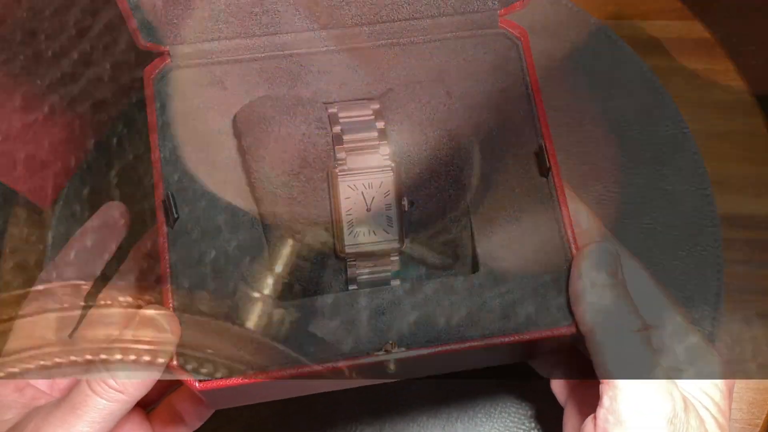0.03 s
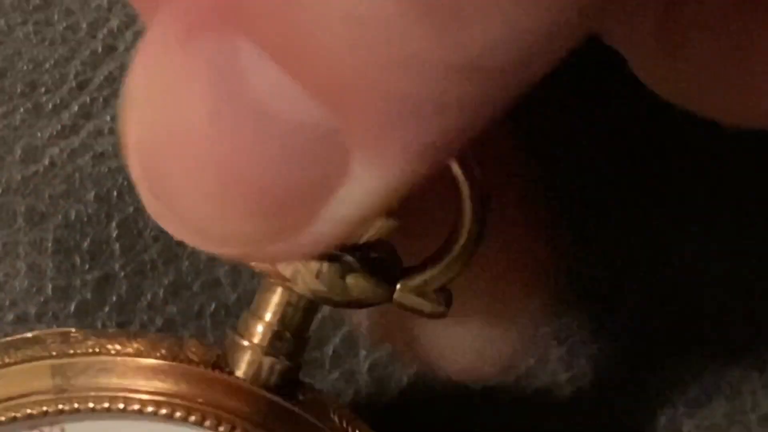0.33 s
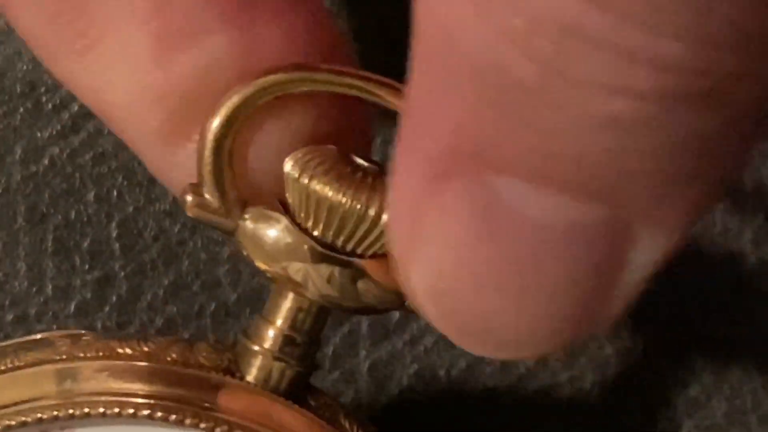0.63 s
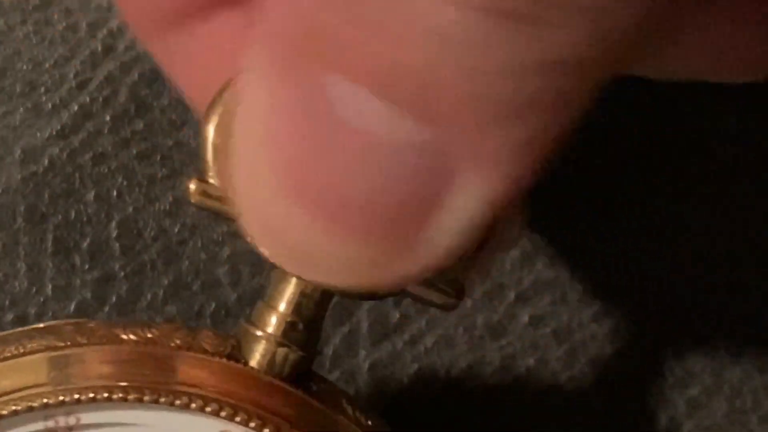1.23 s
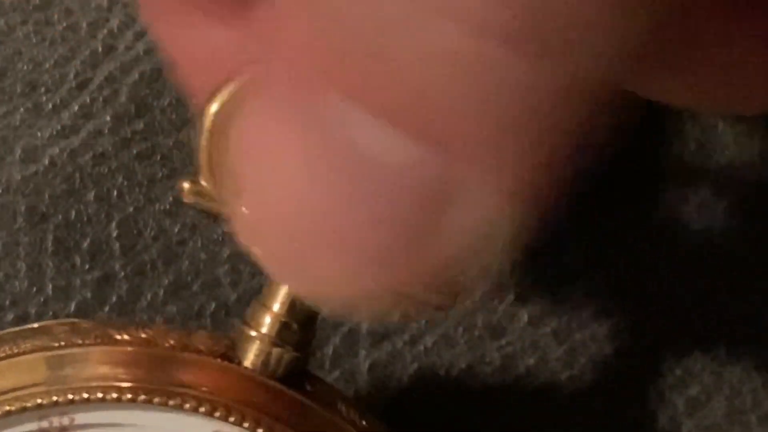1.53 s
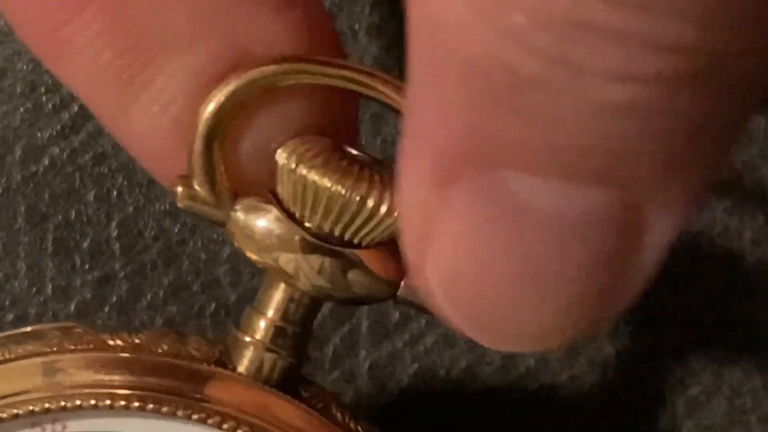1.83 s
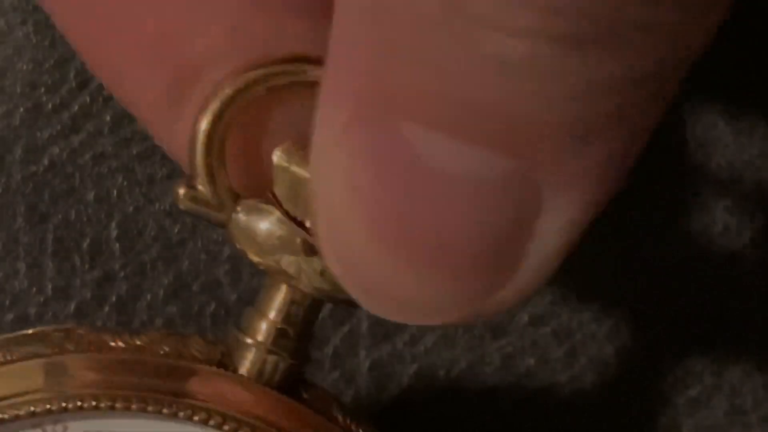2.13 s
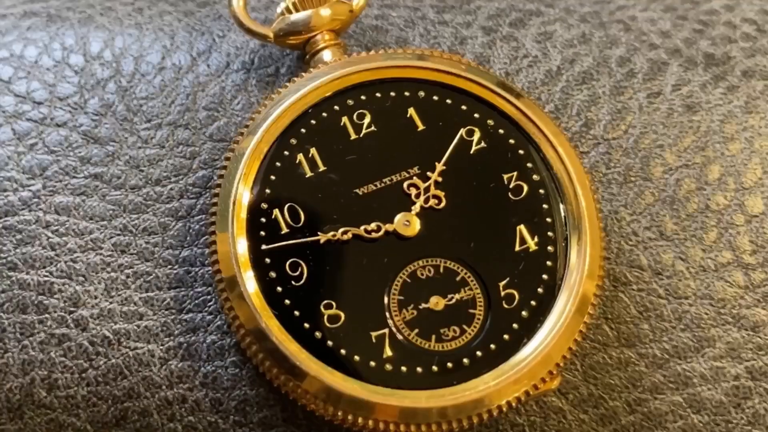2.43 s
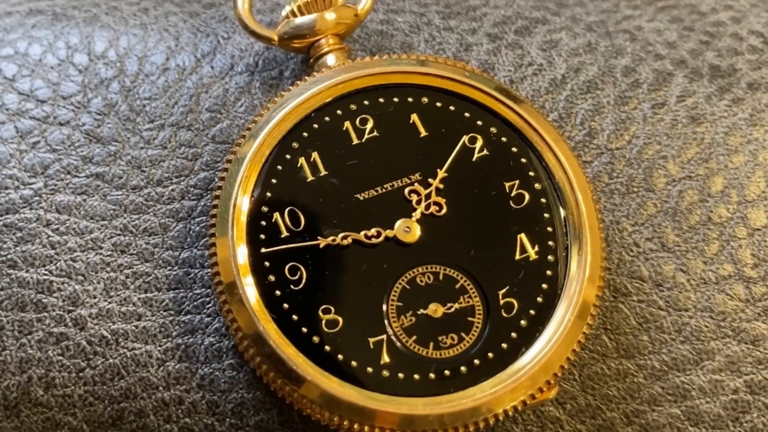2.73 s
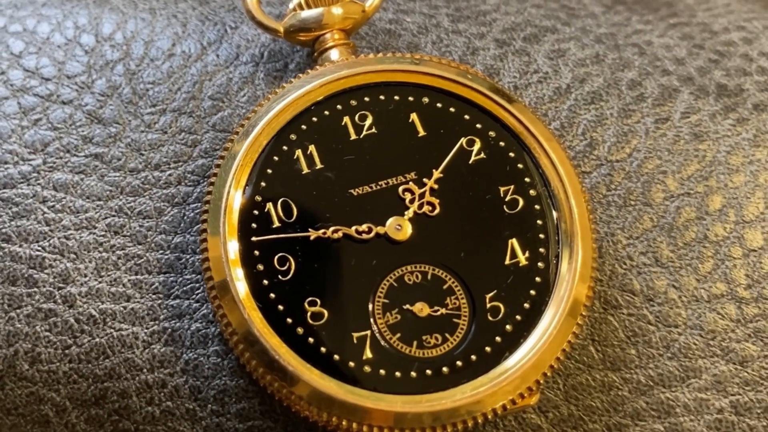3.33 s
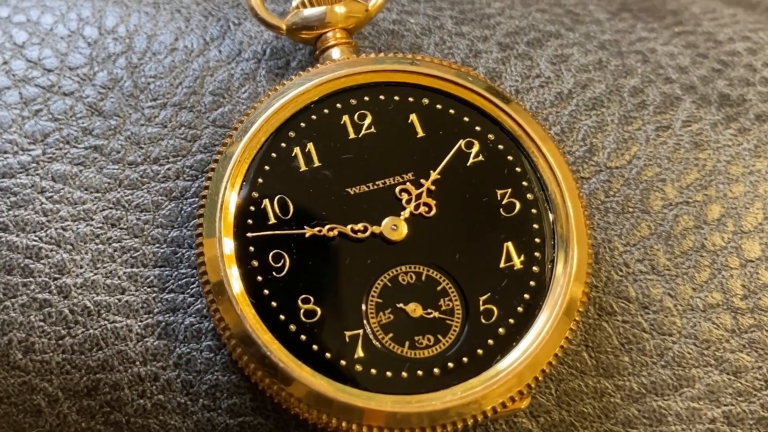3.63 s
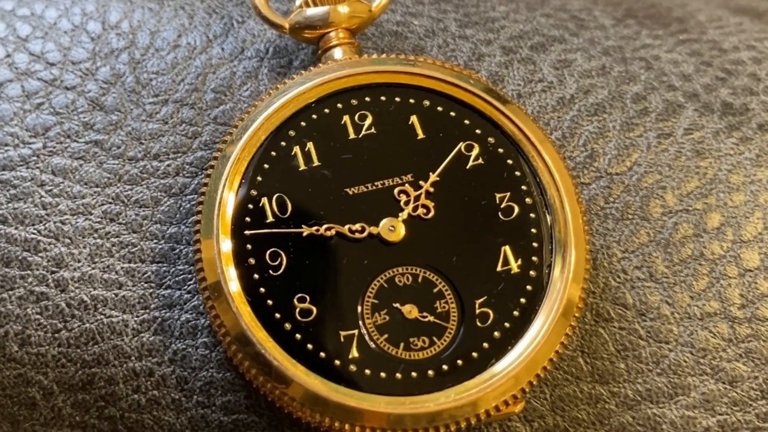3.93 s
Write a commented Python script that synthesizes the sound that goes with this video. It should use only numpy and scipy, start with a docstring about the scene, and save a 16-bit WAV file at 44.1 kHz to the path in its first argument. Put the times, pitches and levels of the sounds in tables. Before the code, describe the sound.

Fingers wind a pocket watch in three clicking strokes, followed by soft, quick ticking.

```python
"""In a humming room, fingers wind a pocket watch close by. Its pawl (a small catch) snaps over the
ratchet teeth in three strokes; between them the thumb rubs the crown (the winding knob), and crown
and bow (the carrying loop) knock as the fingers take a new grip. A deep rumble ends early with a pop.
After a brief silence the watch lies in a quieter room, ticking six times a second as its
escapement lets a toothed wheel go and catches it again."""
import sys
import numpy as np
from scipy import signal
from scipy.fft import rfft, irfft
from scipy.io import wavfile

SR = 44100
rng = np.random.default_rng(int(sys.argv[2]) if len(sys.argv) > 2 else 0)


def transcribe(u):
    """Save the signal u as a 16-bit wav file named by the first command-line argument.

    u: samples, shape (n,) or (channels, n), limited to [-1, 1]; the rate is SR.
    q: integer samples, one column per channel.
    """
    v = np.clip(np.atleast_2d(u).T, -1, 1)
    q = np.round(v * 32767).astype(np.int16)
    wavfile.write(sys.argv[1], SR, q)


N = 176400
T = np.arange(N) / SR
FREQS = np.arange(N // 2 + 1) * SR / N


def amp(db):
    """Turn decibels into a gain."""
    return 10 ** (np.asarray(db) / 20)


def unit(x):
    """Scale a sound so that its energy is 1."""
    return x / np.sqrt(np.sum(x ** 2))


def curve(points, column=1):
    """Join the dots of one table column, giving a value at every pitch."""
    table = np.array(points, float)
    return np.interp(np.log(FREQS + 1), np.log(table[:, 0]), table[:, column])


def colour(x, db):
    """Make some pitches stronger and others weaker, following the curve db."""
    cepstrum = irfft(np.log(amp(db)), N)
    cepstrum[1:N // 2] *= 2  # folded forward, so nothing rings before the hit
    cepstrum[N // 2 + 1:] = 0
    response = irfft(np.exp(rfft(cepstrum)), N)[:len(x) // 100]
    return signal.fftconvolve(x, unit(response))[:len(x)]


def add(out, start_s, x):
    """Mix x into out at the given time."""
    i = max(int(start_s * SR), 0)
    out[i:i + len(x)] += x[:len(out) - i]


def noise(shape):
    """Noise of average (rms) level 1; shape sets the share of each pitch."""
    return unit(irfft(rfft(rng.standard_normal(N)) * shape, N)) * np.sqrt(N)


def burst(decay_s, size=6000):
    """A small metal part shivers; decay_s is always the time to fade by 60 dB."""
    return unit(rng.standard_normal(size) * amp(-60 * T[:size] / decay_s))


def rattle(length_s, decay_s, edge_hz=SR, size=2048):
    """Metal chatters on metal for a moment, then dies away; it is weak above edge_hz."""
    hz = np.linspace(0, SR / 2, size // 2 + 1)
    chatter = irfft(rfft(rng.standard_normal(size)) / (1 + (hz / edge_hz) ** 4))
    return unit(chatter * amp(-60 * np.maximum(T[:size] - length_s, 0) / decay_s))


def ring(notes, edge_hz, scatter_db, detune, size=6000):
    """Struck metal rings, a little differently each time; a soft blow barely stirs notes above edge_hz."""
    t = T[:size]
    hz, db, decay_s = np.array(notes, float).T[:, :, None]
    gain = amp(db + scatter_db * rng.standard_normal(hz.shape)) / (1 + (hz / edge_hz) ** 4)
    hz = hz * (1 + detune * rng.standard_normal(hz.shape))
    waves = np.sin(2 * np.pi * (hz * t + rng.random(hz.shape)))
    attack = np.minimum(t / .00026, 1)
    return unit(np.sum(gain * waves * amp(-60 * t / decay_s), axis=0) * attack)


def stereo(x, table):
    """Each pitch reaches left and right with its own timing and level."""
    half = np.exp(.5j * curve(table)) * amp(curve(table, column=2) / 2)
    return irfft(rfft(x) * np.array([half, 1 / half]), N)


# tone of the sound that the walls send back: pitch_hz, level_db
WALL_TONE = [(1000, -6), (3000, 8), (5300, 3), (6400, 7), (7500, 3), (9000, -3), (12000, -3.5), (14500, -7),
             (16500, -19)]


def echo(x, decay_s, level_db):
    """The walls of a small room blur a sound into a short tail, different left and right."""
    fade = amp(-60 * T / decay_s) * np.minimum(T / .0022, 1)
    tails = [colour(rng.standard_normal(N) * fade, curve(WALL_TONE)) for _ in range(2)]
    return amp(level_db) * np.array([signal.fftconvolve(x, unit(tail))[:N] for tail in tails])


# tone of the air in each room: pitch_hz, level_db
WINDING_AIR = [(15, -77.5), (25, -37), (38, -29), (56, -6), (80, -1), (102, -4), (120, -21), (145, 1.5),
               (200, -11), (309, -8), (394, -16), (775, -22.5), (1840, -34.5), (2690, -44.5), (3820, -50),
               (6210, -57), (16000, -68.5)]
TICKING_AIR = [(15, -38), (25, -7.5), (53, -3.5), (92, -7), (166, -13), (236, -25), (427, -34.5),
               (714, -37.5), (775, -42.5), (2990, -55), (6380, -57), (10400, -62), (12500, -65),
               (16000, -83)]
# hums in each room: pitch_hz, level_db, width_hz
WINDING_HUMS = [(75.1, -47.5, 13.9), (95.7, -49, 9.6), (153, -53.5, 13.2), (485, -73, 22),
                (1116.6, -73.5, 6.7)]
TICKING_HUMS = [(72.8, -52, 3.4), (90.36, -51, 3.5), (139.6, -55, 12.2)]
# how wide each room sounds: pitch_hz, side_over_middle_db, left_over_right_db
WINDING_WIDTH = [(60, -35, 0), (180, -26, .4), (310, -16, 0.5), (696, -4.5, 2.5), (1300, -1, 1),
                 (2500, -15, 0), (9050, -2.5, 0.5)]
TICKING_WIDTH = [(58.5, -21.5, -1), (145, -4, -5.5), (407, -3.5, -0.5), (1470, -1, -0.5),
                 (9000, -2.5, -3.5)]


def room_tone(air, hums, widths, air_db):
    """Rushing air and wavering hums; the deep bass is alike left and right."""
    shape = amp(curve(air))
    middle = amp(air_db) * noise(shape)
    for hz, db, width_hz in hums:
        middle += amp(db) * noise(1 / (1 + (2 * (FREQS - hz) / width_hz) ** 2))
    side_spectrum = rfft(amp(air_db) * noise(shape)) * amp(curve(widths))
    sign = np.array([[1], [-1]])  # left, right
    balance = amp(sign * curve(widths, column=2) / 2)
    return irfft((rfft(middle) + sign * side_spectrum) * balance, N)


def fan(pitch_hz=311.4, level_db=-53.5, waver_db=1.3, waver_hz=15):
    """One steady note whose level wavers slightly, like a fan in the room."""
    waver = noise(1 / (1 + (FREQS / waver_hz) ** 4))
    return np.sqrt(2) * amp(level_db - waver_db * waver) * np.sin(2 * np.pi * pitch_hz * T)


def rumble(pitch_hz=10.7, level_db=-22.5, end_s=.1767, pop_db=-27.5):
    """A very deep rumble at the start that stops with a soft pop."""
    shape = np.minimum(FREQS / pitch_hz, 1) / (1 + (FREQS / pitch_hz) ** 3)
    fade = np.clip(np.minimum(T, end_s - T) / .018, 0, 1)
    deep = amp(level_db) * noise(shape) * fade
    add(deep, end_s, -amp(pop_db) * np.exp(-T / .012))
    return deep


# the pawl drops over one tooth: start_s, level_db
PAWL_CLICKS = [(.0052, -3), (0.0342, -3.5), (0.0801, -1), (0.8376, -1.5), (0.9313, -6), (0.998, -4.5),
               (1.0466, -3), (1.0874, -3.5), (1.112, -2), (1.149, -2), (1.1938, -2), (1.2107, -1.5),
               (1.2235, -2), (1.2355, -1.5), (1.2499, -2), (1.274, -3), (2.0842, -3.5), (2.1209, -1.5),
               (2.149, -3.5), (2.1698, -1.5), (2.1849, -2), (2.201, -4.5), (2.2249, -1.5), (2.259, 0),
               (2.2751, -2), (2.288, -1.5), (2.3057, -1), (2.3556, -2.5), (2.459, -2.5)]
# tone of its snap: pitch_hz, level_db
SNAP_TONE = [(1000, -35), (2100, -31), (2900, -5), (4400, -2), (5900, -7.5), (6500, -2.5), (7300, -11),
             (8800, 3.5), (10700, -2), (11500, 1), (12700, -4.5), (14300, 7.5), (15600, 1.5), (17000, -25)]
# ringing notes of the winding works: pitch_hz, level_db, decay_s
WORKS_NOTES = [(3080, -11, .014), (3550, -8.5, .011), (4380, -3.5, .013), (5620, -23, .06),
               (7950, -5, .006), (8870, 3, .009), (9280, -1, .008), (11580, -20, .055), (14030, -24, .045),
               (14150, -3.5, .007)]
# how the winding reaches the two sides: pitch_hz, left_lead_radians, left_over_right_db
WINDING_STEREO = [(300, 0, .5), (1100, -.7, 0), (1500, .1, 0), (2400, .1, 0), (3300, 1.1, 0), (5000, .5, 0),
                  (8000, .8, 0), (11000, 1.7, 0), (16000, 2.7, 0)]


def ratchet(snap_db=-18.5, works_db=-18, chatter_db=-3, case_db=-7, bounce_db=-3.5):
    """The pawl cracks off each tooth, chatters and bounces once, ringing the works and the case."""
    snaps, rings = np.zeros((2, N))
    for start_s, db in PAWL_CLICKS:
        bounce_s = .0009 + .0001 * rng.standard_normal()
        for delay_s, soft_db in ((0, 0), (bounce_s, bounce_db)):
            shiver = amp(chatter_db) * burst(decay_s=.0045) + amp(case_db) * burst(decay_s=.015)
            crack = signal.unit_impulse(len(shiver))
            add(snaps, start_s + delay_s, amp(db + soft_db + snap_db) * (crack + shiver))
        add(rings, start_s, amp(db + works_db) * ring(WORKS_NOTES, SR, scatter_db=1.5, detune=.002))
    direct = colour(snaps, curve(SNAP_TONE)) + rings
    return stereo(direct, WINDING_STEREO) + echo(direct, decay_s=.22, level_db=-16.5)


# the thumb slides over the crown: start_s, length_s, level_db
THUMB_RUBS = [(0.063, 0.46, -75.5), (0.435, 0.56, -83), (0.665, 0.047, -80), (1.33, 0.084, -70),
              (1.394, 0.27, -76), (1.663, 0.11, -78.5), (1.765, 0.25, -83)]
# tone of the rubbing: pitch_hz, level_db
RUB_TONE = [(1200, 1), (2600, 0), (4000, 5), (5500, 4), (6300, -2), (7500, -7), (11000, -9), (15500, -30)]


def rubbing(rough_db=2.5, grain_hz=120):
    """Skin slides over the ridged crown with a faint, grainy hiss."""
    swell = np.zeros(N)
    for start_s, length_s, db in THUMB_RUBS:
        add(swell, start_s, amp(db) * np.hanning(int(length_s * SR)) ** .5)
    grain = amp(rough_db * noise(1 / (1 + (FREQS / grain_hz) ** 2)))
    hiss = noise(amp(curve(RUB_TONE)))
    return stereo(swell * grain * hiss, WINDING_STEREO)


# crown and bow knock: start_s, level_db, treble_edge_hz, rattle_s, extra_ring_db
GRIP_KNOCKS = [(0.3032, -12, 10000, 0.0017, -8), (0.3321, 1, 15000, 0.0011, 1),
               (0.3347, -3, 9000, 0.0057, 2.5), (0.553, -14, 3380, 0.0016, -12),
               (1.4666, -20.5, 6800, 0.0018, -4), (1.507, -12, 9900, 0.0024, -11.5),
               (1.5102, 4.5, 11000, 0.0025, -2), (1.514, -4.5, 6000, 0.0028, 4.5),
               (1.52, -3.5, 10000, 0.0026, 0), (1.5336, -2.5, 13700, 0.0032, -2),
               (1.6725, -24, 5000, .003, 2), (1.708, -2, 2400, 0.001, -10.5)]
# tone of metal meeting metal: pitch_hz, level_db
CONTACT_TONE = [(700, -36.5), (1000, -6), (1400, 7.5), (1900, -3), (2600, -7), (4000, 1.5), (5000, -1.5),
                (5900, -6), (6400, -3.5), (7200, -6.5), (9500, -2), (11400, 5.5), (13500, -4.5),
                (16500, -12)]
# ringing notes of bow and case: pitch_hz, level_db, decay_s
BOW_NOTES = [(1097, -16.5, 0.084), (1324, 0.5, .035), (1471, 11, 0.041), (2940, -10, 0.043),
             (4230, -14.5, 0.022), (4620, -5, 0.033), (4950, 0, 0.047), (5780, 1, 0.035),
             (8900, -10, 0.023), (11700, -19, .012)]


def knocks(contact_db=-19.5, bow_db=-15.5):
    """Crown and bow rattle for a few milliseconds and ring, damped by the fingers."""
    contacts, rings = np.zeros((2, N))
    for start_s, db, edge_hz, rattle_s, ring_db in GRIP_KNOCKS:
        add(contacts, start_s, amp(db + contact_db) * rattle(rattle_s, decay_s=.025, edge_hz=edge_hz))
        ringing = ring(BOW_NOTES, edge_hz, scatter_db=1.5, detune=.005)
        add(rings, start_s, amp(db + ring_db + bow_db) * ringing)
    direct = colour(contacts, curve(CONTACT_TONE)) + rings
    return stereo(direct, WINDING_STEREO) + echo(direct, decay_s=.22, level_db=-16)


# beats of the watch: drop_s, level_db, unlock_lead_s, push_lead_s, push_over_drop_db
WATCH_BEATS = [(2.5846, -8, .023, 0.015, -18), (2.7597, -1, 0.023, 0.013, -20),
               (2.9166, -2, .0245, 0.011, -9), (3.0923, -1.5, 0.025, 0.014, -14),
               (3.2494, -4, 0.024, .0124, -7), (3.425, 1, 0.021, 0.015, -15), (3.5828, 0, 0.02, 0.014, -10),
               (3.7587, 0, 0.024, 0.014, -9.5), (3.9162, -1, 0.023, 0.013, -9)]
# tone of a beat: pitch_hz, level_db
BEAT_TONE = [(2000, -48), (4800, -26.5), (6500, -28), (8400, -22), (9700, 0), (10900, -3), (11800, -1),
             (13000, -7), (14300, -9), (15400, -13), (16800, -19)]
# ringing notes of the escapement: pitch_hz, tock_db, tick_db, decay_s
ESCAPEMENT_NOTES = [(4750, -16, -40, .014), (8830, -34, -23, .09), (9630, -2, 0, .034), (9820, 0, 0, .012),
                    (10800, -10, -14, .012), (11850, 2, 4, .0085), (13400, -3, -6, .011),
                    (15500, -12, -12, .012)]
# how the ticking reaches the two sides: pitch_hz, left_lead_radians, left_over_right_db
TICKING_STEREO = [(79, -9, 2), (4950, 2, 0), (8750, 1, 0), (9870, -6.5, 13), (11040, -2, 6),
                  (11700, -1.2, 8), (13600, -1, -2), (15600, 2.5, -2)]


def ticking(level_db=-26, unlock_db=-20):
    """The wheel unlocks, pushes, then drops loudly onto a catch; two catches take turns, tock and tick."""
    blows, rings = np.zeros((2, N))
    tock = [(hz, db, decay_s) for hz, db, _, decay_s in ESCAPEMENT_NOTES]
    tick = [(hz, db, decay_s) for hz, _, db, decay_s in ESCAPEMENT_NOTES]
    # two kinds of touch: rattle_s, decay_s, treble_edge_hz, extra_ring_db
    slide, drop = (.0007, .009, 12300, -3.5), (0, .014, SR, 0)
    for beat, (drop_s, db, unlock_lead_s, push_lead_s, push_db) in enumerate(WATCH_BEATS):
        steps = (unlock_lead_s, unlock_db, slide), (push_lead_s, push_db, slide), (0, 0, drop)
        for lead_s, soft_db, (rattle_s, decay_s, edge_hz, ring_db) in steps:
            gain = amp(level_db + db + soft_db)
            add(blows, drop_s - lead_s, gain * rattle(rattle_s, decay_s, edge_hz))
            ringing = ring(tick if beat % 2 else tock, edge_hz, scatter_db=1, detune=.0008)
            add(rings, drop_s - lead_s, gain * amp(ring_db) * ringing)
    direct = colour(blows, curve(BEAT_TONE)) + rings
    return stereo(direct, TICKING_STEREO) + echo(direct, decay_s=.14, level_db=-17)


def scene(stop_s=2.507, return_s=2.579, notch_hz=6330):
    """Winding, with a thin slice of treble cut out; a short silence; then ticking."""
    winding = ratchet() + knocks() + rubbing()
    winding += room_tone(WINDING_AIR, WINDING_HUMS, WINDING_WIDTH, air_db=-48) + fan() + rumble()
    winding = signal.lfilter(*signal.iirnotch(notch_hz, Q=11, fs=SR), winding)
    resting = ticking() + room_tone(TICKING_AIR, TICKING_HUMS, TICKING_WIDTH, air_db=-53)
    fade_out = np.clip((stop_s - T) / .0078 + 1, 0, 1)
    fade_in = np.clip((T - return_s) / .095, 0, 1) ** .5
    return winding * fade_out + resting * fade_in


def record(dry):
    """Cut away the highest treble, above 16500 Hz."""
    return signal.sosfilt(signal.ellip(8, .2, 70, 16500, fs=SR, output="sos"), dry)


dry = scene()
out = record(dry)
transcribe(out)
```